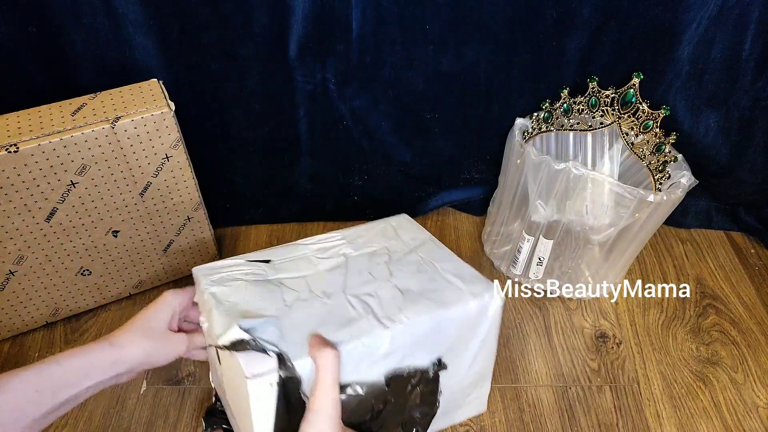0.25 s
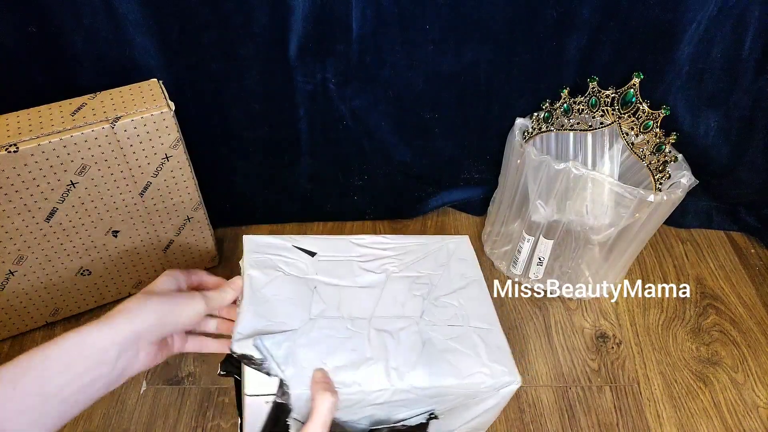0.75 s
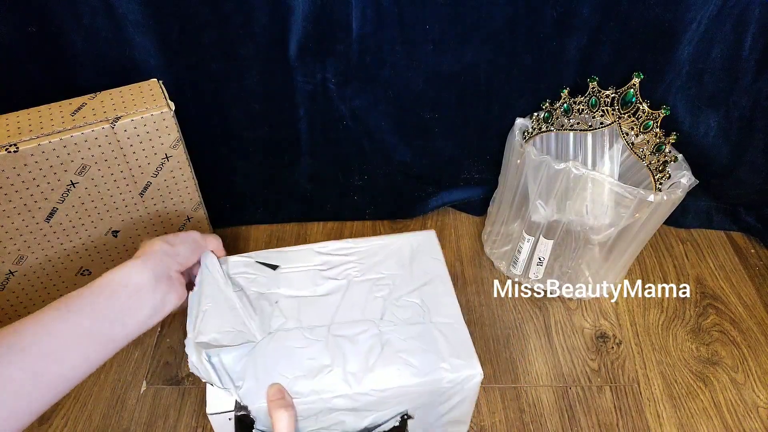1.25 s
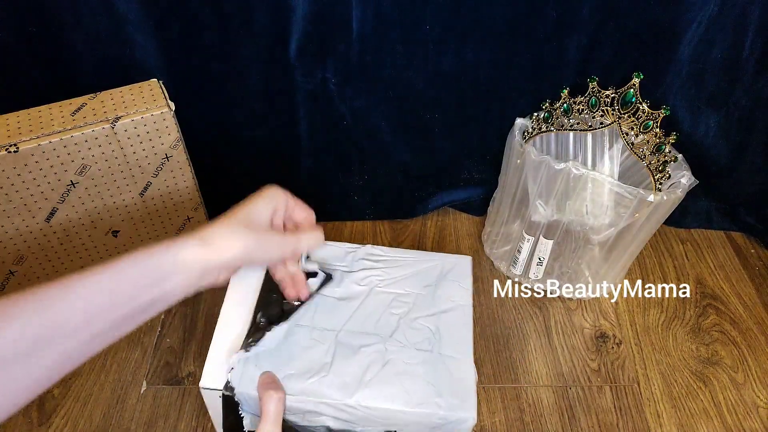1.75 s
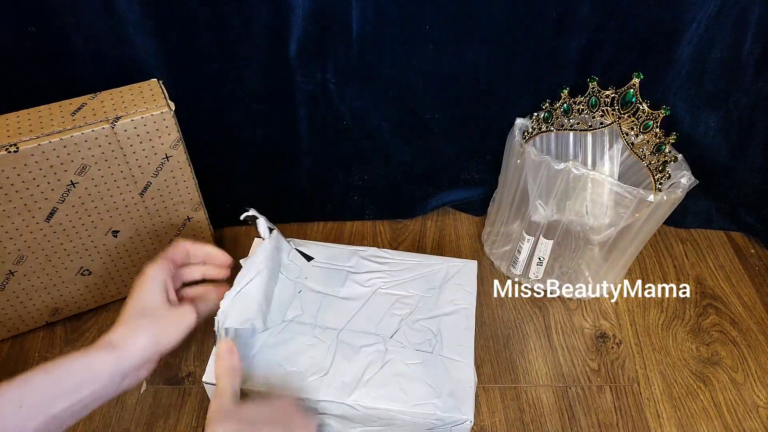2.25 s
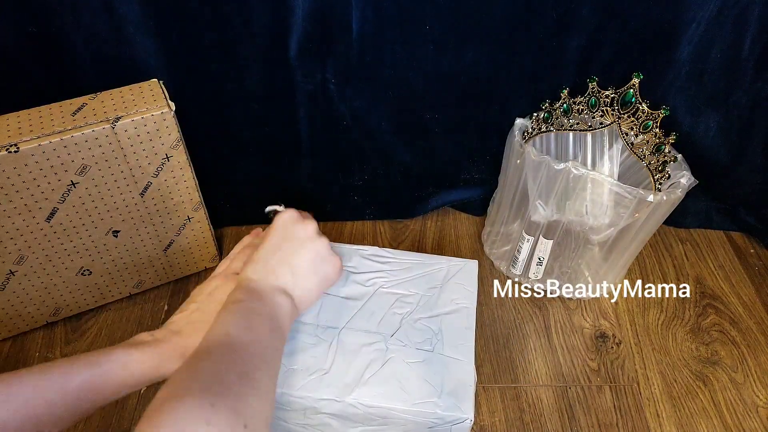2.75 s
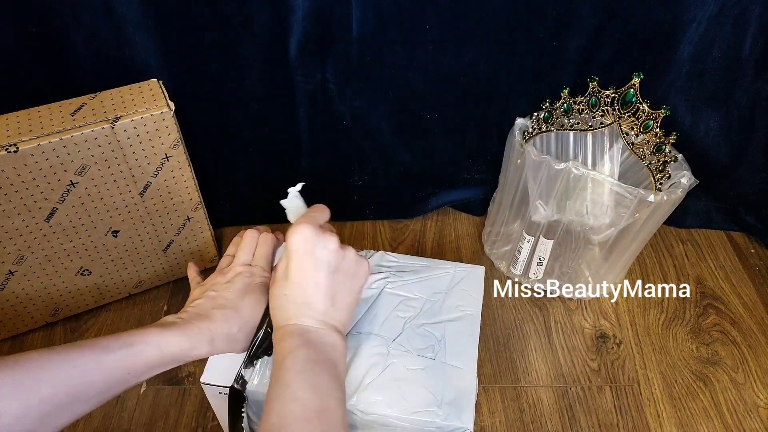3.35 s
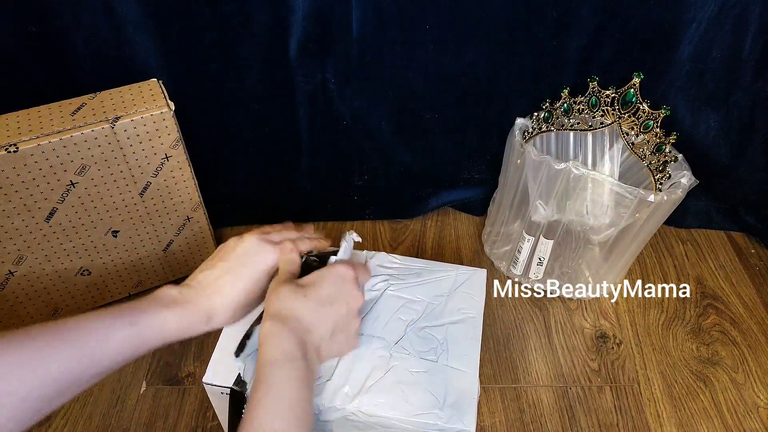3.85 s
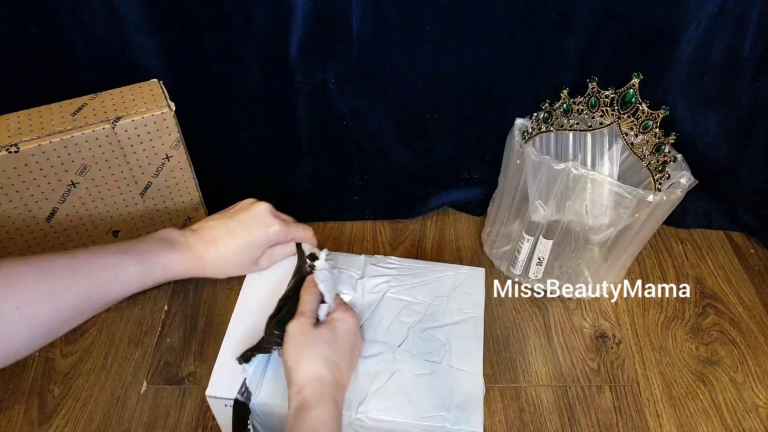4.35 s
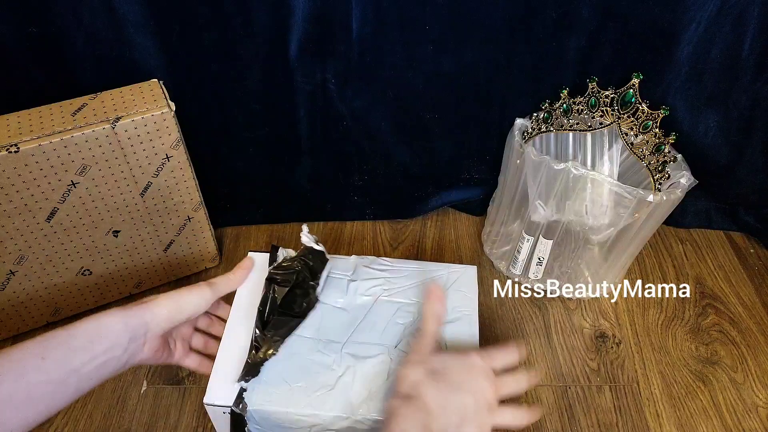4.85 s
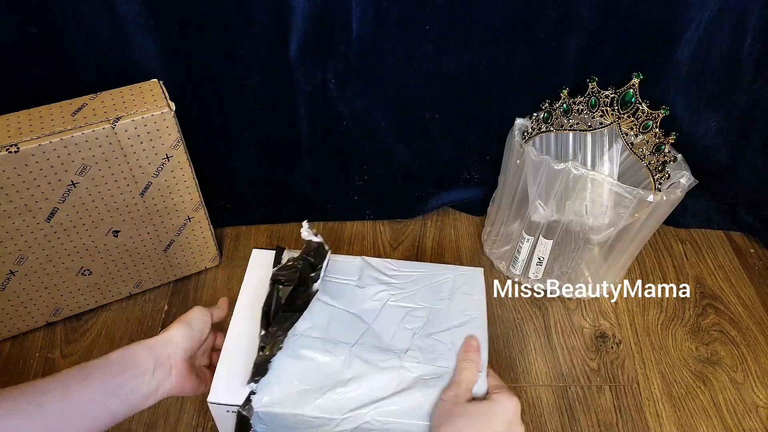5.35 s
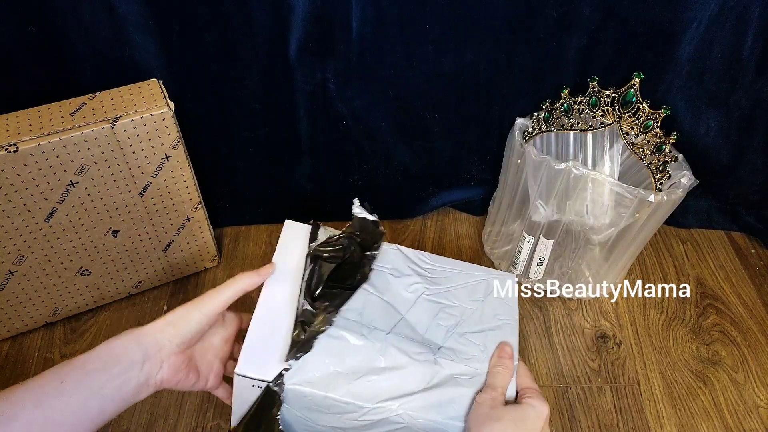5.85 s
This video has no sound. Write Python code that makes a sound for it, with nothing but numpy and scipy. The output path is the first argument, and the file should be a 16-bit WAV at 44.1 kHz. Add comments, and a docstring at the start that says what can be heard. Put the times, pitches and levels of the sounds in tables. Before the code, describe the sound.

Crisp plastic crackles and pops over a faint low room hush, heard closely with a short indoor tail. The wrapping is tugged, released and tugged again; individual creases snap above the fine rustle and a quick tear bursts out. The cardboard box underneath bumps dully against the wooden table and shifts with short muffled slides, ending in a clear bump and fading rustle.

```python
"""In a small room, two hands pull a plastic mailing bag off a cardboard box on a wooden table.
The film rustles with countless clicks of coloured noise; single creases snap and short volleys rip.
Damped sines and noise bursts make the box knock and the table boom, and shaped noise makes it slide.
Fingers squeak on the film as gliding, raspy harmonics; a noise tail gives the room, soft noise its air.
"""
import sys
import numpy as np
from scipy import signal
from scipy.fft import rfft, irfft, next_fast_len
from scipy.io import wavfile
from scipy.ndimage import uniform_filter1d, map_coordinates

SR = 44100
rng = np.random.default_rng(int(sys.argv[2]) if len(sys.argv) > 2 else 0)


def to_wav(s):
    """Save 16-bit WAV."""
    ch = np.atleast_2d(s).T  # columns
    pcm = np.round(np.clip(ch, -1, 1) * 32767)  # PCM
    wavfile.write(sys.argv[1], SR, pcm.astype(np.int16))


N = 269892
TIME = np.arange(N) / SR  # s

# Levels in the tables are dry: trims in the functions and the room come on top.
# A hand takes hold of the film and pulls. Each row: start in seconds, length in seconds,
# crinkle level in dB, fizz above the crinkle in dB, dull rub above the crinkle in dB.
PULLS = [(0.0, 0.024, -49.5, 1, -7.5), (0.249, 0.059, -48, -1.5, -9), (0.401, 0.065, -49.5, 2, -12),
         (0.631, .03, -61.5, -15, 5), (0.757, .19, -48.5, -3.5, -19), (0.985, 0.16, -48, -5.5, -35),
         (1.187, .3, -46, -4, -8), (1.515, .12, -39, -2, -5.5), (1.686, 0.034, -40, -3, -0.5),
         (1.749, .06, -44.5, 1, -9), (1.896, .18, -49, 0.5, -7.5), (2.17, 0.1, -57.5, 0, -27),
         (2.376, .07, -49, 2, -4.5), (2.442, 0.064, -44, 0, -14), (2.588, 0.064, -46, 2, -7),
         (2.704, 0.206, -47.5, 0.5, -8.5), (2.907, 0.16, -40.5, -1.5, -7), (3.158, 0.0346, -42.5, -4, -8),
         (3.255, 0.028, -42, 1.5, -2.5), (3.353, .055, -46, -9.5, -6), (3.599, 0.041, -45, -2.5, -8.5),
         (3.704, 0.32, -50, -4.5, -5.5), (3.94, 0.064, -37.5, -1.5, -6.5), (4.05, .145, -44.5, -1.5, -7.5),
         (4.29, 0.11, -53, -3, -3), (4.431, 0.054, -53, 2.5, -7), (4.516, .05, -49, -2.5, -10.5),
         (4.634, 0.063, -46, -2.5, -9), (4.857, 0.15, -45.5, -5, -7.5), (5.038, 0.051, -42.5, -6, -11.5),
         (5.12, 0.029, -50.5, 5, -13), (5.207, 0.031, -42.5, -2, -4.5), (5.415, 0.11, -51, 2.5, -6.5),
         (5.637, .125, -43.5, 1, -8.5), (5.813, 0.24, -54, -2, -15)]
# Stir of film that is only held: levels of dull rub, crinkle and fizz in dB.
HELD_FILM_DB = (-64.5, -60.5, -61)
# The hands rest. Each row: start in seconds, end in seconds.
PAUSES = [(0.53, 0.65), (2.31, 2.35), (4.76, 4.885), (5.57, 5.645)]
PAUSE_DB = -11.5
# Every movement sets in quickly, builds while it lasts and dies away (release: time to fall to 1/e).
ATTACK_S, BUILD_DB, RELEASE_S = 0.018, 2.5, 0.048
# Colour of the rustling film. Each row: frequency in Hz, relative gain in dB.
FILM_COLOUR = [(240, -36), (400, -4.5), (536, -16), (616, -17), (777, -6), (1130, -10), (1760, -10.5),
               (1900, -9.5), (2360, -6.5), (2970, 0), (3310, -1), (6440, -1.5), (8110, -11), (11900, 1),
               (16000, -8.5)]
# Large creases that snap. Each row: start in seconds, level in dB, treble over bass in dB.
SNAPS = [(0.084, -47, 3), (0.173, -48.5, 12), (0.258, -45.5, 9), (0.421, -49, 23), (0.803, -40.5, 3),
         (0.875, -40.5, 2), (1.0173, -47.5, 7), (1.036, -37.5, 13), (1.081, -40.5, 17), (1.105, -45, 16),
         (1.1982, -40, 27), (1.2362, -40, 8), (1.3314, -39, 6), (1.3728, -38, 5.5), (1.4546, -38.5, 27.5),
         (1.5504, -38, 22), (1.5929, -32.5, 12), (1.6053, -35, 10), (1.658, -39, 18), (1.702, -27, 4.5),
         (1.726, -37, 15), (1.737, -35, 22), (1.8504, -38, -40), (2.028, -46.5, 19), (2.1785, -44, 27),
         (2.285, -46.5, 10), (2.4589, -38.5, 7), (2.6183, -36, 25), (2.6455, -38.5, 12), (2.738, -36.5, 22),
         (2.9665, -35.5, 10), (3.0728, -34.5, 8), (3.169, -43, 12), (3.19, -44, 6), (3.2079, -36, 10),
         (3.2161, -45, 5), (3.236, -41, 7), (3.258, -29.5, 13), (3.3778, -42, 13), (3.4, -40, 13),
         (3.649, -44.5, 4), (4.062, -38.5, 17), (4.101, -38, 5), (4.161, -40, 1), (4.1325, -39, 2),
         (4.186, -40, 5), (4.2404, -34.5, -5), (4.2989, -40, 5), (4.3089, -36, 6.5), (4.3306, -45, 9),
         (4.3619, -32.5, -3), (4.534, -45.5, -1), (4.56, -40.5, -5), (4.887, -44.5, 0), (5.034, -41.5, 18),
         (5.063, -35.5, 18), (5.126, -43, 10), (5.2553, -43.5, -2), (5.3458, -46, 22), (5.42, -43, -3),
         (5.7517, -30, 4.5), (5.987, -47.5, 15)]
# Colour of a snapping crease. Each row: frequency in Hz, relative gain in dB.
SNAP_COLOUR = [(300, -34), (900, -6.5), (1450, -9.5), (2100, 3.5), (3000, 4), (4300, 4.5), (6300, -1),
               (8200, -13), (12000, -2.5), (16000, -17)]
# Runs of tearing or crushing. Each row: start in seconds, time the fade counts from in seconds
# (if before the start, the run sets in at once, already fading), fade to 1/e in seconds, level in dB.
RIPS = [(0.786, 0.806, 0.012, -38.5), (1.585, 1.605, 0.015, -23.5), (2.079, 2.092, 0.0084, -35),
        (3.272, 3.257, 0.013, -42)]
# Fingers slip on the film. Each row: start in seconds, length in seconds,
# pitch at the start, middle and end in Hz, level in dB before the swell.
SQUEAKS = [(0.401, 0.015, 3100, 3200, 2400, -47), (2.209, 0.029, 2710, 2850, 3300, -47.5),
           (5.043, 0.086, 719, 780, 1110, -45), (5.209, 0.073, 1490, 1020, 800, -47.5),
           (5.256, 0.0354, 564, 550, 446, -46.5)]
# The box meets the table or a hand. Each row: time in seconds, thud, clack and table boom levels in dB.
KNOCKS = [(0.002, -48.5, -52, -42.5), (0.464, -37.5, -64, -55.5), (0.669, -34, -47, -55),
          (0.752, -30.5, -44, -44), (0.791, -23, -42, -40.5), (0.801, -25, -28.5, -51),
          (0.846, -34, -61, -51), (0.871, -29, -40, -41), (1.401, -33, -55, -46),
          (1.597, -34.5, -26.5, -66), (1.789, -30, -48, -48), (1.924, -28.5, -43, -44.5),
          (1.937, -43, -38, -43.5), (2.088, -27.5, -37.5, -48.5), (2.358, -38.5, -80, -54),
          (2.457, -30, -27.5, -48.5), (4.01, -38.5, -50, -56), (4.347, -36.5, -36.5, -63),
          (4.889, -20, -55, -65), (4.905, -32.5, -36, -62), (5.423, -36, -55, -66),
          (5.723, -38.5, -48, -48), (5.752, -24.5, -26.5, -42.5)]
# Ring of the box on the table. Each row: frequency in Hz, mean relative level in dB,
# time to fall by 60 dB in seconds.
BOX_MODES = [(197.5, -6.5, 0.12), (250, -7.5, 0.19), (273.2, -2, 0.098), (340, -21, 0.017),
             (374.6, -7, 0.21), (463, -19, 0.16), (557, -37, 0.033), (600, -45, 0.27), (772, -20, 0.17),
             (830, -28, 0.2)]
TABLE_HZ, TABLE_T60_S = 119.5, 0.45
# The box is dragged over the table. Each row: start in seconds, length in seconds, level in dB.
DRAGS = [(0.0, .3, -58), (0.7, 0.12, -51), (1.015, 0.07, -61.5), (1.574, 0.21, -51.5), (2.086, 0.14, -72),
         (4.916, 0.12, -55.5), (5.76, 0.13, -60.5)]
# Colour of cardboard sliding on wood. Each row: frequency in Hz, relative gain in dB.
SLIDING_COLOUR = [(29, -50), (50, -19), (118, 2), (150, 3), (265, 5), (400, 0), (535, -4), (657, -2.5),
                  (733, -25), (900, -20), (1170, -48), (1980, -120)]
# Where the hands work. Each row: time in seconds, delay of the right channel behind the left in seconds.
PLACE = [(0, .0001), (2.0, .00009), (3.3, .00005), (4.8, .00009), (5.1, -.00002), (6.12, -.00004)]
# Decay of the room. Each row: frequency in Hz, time to fall by 60 dB in seconds.
ROOM_T60 = [(120, 0.35), (300, 0.33), (900, 0.35), (4000, 0.32), (13000, 0.19)]
# Colour of the quiet air. Each row: frequency in Hz, relative gain in dB.
AIR_COLOUR = [(25, -72), (42, 5), (55, -12.5), (88, 7), (150, -9), (270, -4.5), (600, -38), (2000, -18),
              (7000, -21.5), (16000, -24)]
AIR_DB = -60
CUTOFF_HZ = 16100


def rustle(strengths, rub_db=-2.0, crinkle_db=-1.07, fizz_db=1.17, per_s=1100, crowding=0.7):
    """The film crumples under the hands: the harder they pull, the more creases buckle."""
    pull = (strengths[1] / np.median(strengths[1])) ** crowding
    buckles = crackle(per_s * pull, spread_db=4.0, clump_db=5.5)
    out = 0
    for part, strength, trim_db in zip(split(buckles, 2090, 7050), strengths, (rub_db, crinkle_db, fizz_db)):
        out = out + rms_one(part) * strength * from_db(trim_db)
    return out


def handling():
    """Strength of rub, crinkle and fizz: pulls add in power to the held film; all drop in the pauses."""
    resting = sum(1.0 * ((TIME > start) & (TIME < end)) for start, end in PAUSES)
    resting = uniform_filter1d(resting, SR // 50)  # ease in and out
    power = from_db(HELD_FILM_DB)[:, None] ** 2
    for start, length, db, fizz, rub in PULLS:
        peak = from_db([db + rub, db, db + fizz])[:, None]
        power = power + peak ** 2 * movement(start, length) ** 2
    return np.sqrt(power) * from_db(PAUSE_DB * resting)


def movement(start, length):
    """Force of one movement of a hand: attack, build-up, release."""
    t = TIME - start
    attack = np.clip(t / ATTACK_S, 0, 1)
    build = from_db(BUILD_DB * (np.clip(t / length, 0, 1) - 1))
    release = np.exp(-np.maximum(t - length, 0) / RELEASE_S)
    return attack * build * release


def crackle(per_s, spread_db, clump_db, tone=0.84, count=30):
    """Buckles at random, in clumps, from creases that each favour a pitch; steady in level."""
    born = rng.random(N) < per_s * from_db(clump_db * drift(70)) / SR
    loudness = from_db(spread_db * np.minimum(rng.exponential(1, N), 3.3))
    clicks = born * loudness * rng.choice([-1, 1], N)
    dealt = rng.integers(0, count, N)  # which crease each click belongs to
    out = 0
    for k, hz in enumerate(np.geomspace(1300, 15000, count)):
        burst = rms_one(crease(fade_s=0.00045, rise_s=0.0002, scatter_s=0.003, scatter_db=-17))
        pitched = signal.lfilter(*signal.iirpeak(hz, 3, fs=SR), burst)
        burst = burst + tone * rms_one(pitched)
        own_clicks = (clicks * (dealt == k))[None]
        out = out + signal.oaconvolve(own_clicks, burst, axes=1)[:, :N]
    out = colour(out, FILM_COLOUR)
    running_power = uniform_filter1d(np.mean(out ** 2, 0), SR // 20)
    return out / np.sqrt(running_power + 1e-9)


def crease(fade_s, rise_s, scatter_s, scatter_db, unlike=0.73, wander_s=0.00003):
    """One buckle: a brief crack, then scatter from box and table, from a spot of its own."""
    t = np.arange(SR // 60) / SR - 0.001  # silent for the first millisecond
    shared, left, right = rng.standard_normal((3, len(t)))
    crack = np.exp(-abs(t) / fade_s)
    scatter = from_db(scatter_db) * np.exp(-abs(t) / scatter_s)
    shape = np.clip(t / rise_s, 0, 1) * (crack + scatter)
    shift = round(wander_s * SR * rng.standard_normal())  # samples between the channels
    left_burst = (shared + unlike * left) * shape
    right_burst = (shared + unlike * right) * shape
    return np.array([left_burst, np.roll(right_burst, shift)])


def snaps(crack_db=-5.0):
    """Large creases give way one by one: slack film pops low, taut film cracks high."""
    out = np.zeros((2, N))
    for s, db, treble in SNAPS:
        burst = crease(fade_s=0.0009, rise_s=0.0006, scatter_s=0.003, scatter_db=-18)
        parts = split(colour(burst, SNAP_COLOUR), 3190, 6630)
        tilts_db = (-treble / 2, crack_db, treble / 2)
        snap = sum(rms_one(part) * from_db(tilt) for part, tilt in zip(parts, tilts_db))
        add(out, s, from_db(db) * rms_one(snap))
    return out


def rips():
    """A tear runs as a dense volley of buckles that swells or sets in at once, then dies."""
    force = 0
    for start, fade_from, fade, db in RIPS:
        rise = np.clip((TIME - start) / max(fade_from - start, 1e-3), 0, 1)
        dying = np.exp(-np.maximum(TIME - fade_from, 0) / fade)
        force = force + from_db(db) * rise * dying
    return force * crackle(per_s=4000, spread_db=2.5, clump_db=2)


def squeaks(overtone_db=-3.5, stutter_db=3.5, wobble=0.027, top_hz=4200, count=5):
    """Skin sticks and slips on the film: a raspy gliding tone whose slips vary in spacing and force."""
    out = np.zeros(N)
    spacing = 1 + wobble * drift(700)
    force = from_db(stutter_db * drift(400))
    for s, length, first, middle, last, db in SQUEAKS:
        u = np.linspace(0, 1, int(length * SR))
        span = int(s * SR) + np.arange(len(u))
        pitch = np.interp(u, [0, 0.5, 1], [first, middle, last]) * spacing[span]
        phase = 2 * np.pi * np.cumsum(pitch) / SR
        harmonics = sum(from_db(overtone_db * k) * np.sin((k + 1) * phase) for k in range(count))
        tone = cut(harmonics, top_hz, "low", order=4)
        add(out, s, from_db(db) * rms_one(tone * force[span]) * np.sin(np.pi * u))
    return out


def knocks(thud_db=-17.5, clack_db=-22.5, boom_db=-11.5, rattle_db=-3.5,
           rattle_s=0.013, clack_s=0.0041, press_s=0.0011, delay_s=0.00096):
    """Each blow rings the box with fresh strengths, rattles its walls, clacks and booms in the table top."""
    out, t = np.zeros((2, N)), np.arange(SR // 3) / SR
    hz, level, t60 = np.transpose(BOX_MODES)[:, :, None]
    press = np.sin(np.pi / 2 * np.clip(t / press_s, 0, 1)) ** 2  # cardboard yields before it pushes back
    for s, thud, clack, boom in KNOCKS:
        strength = level + 2.5 * rng.standard_normal(hz.shape)  # dB
        modes = from_db(strength - 60 * t / t60) * np.sin(2 * np.pi * (hz * t + rng.random(hz.shape)))
        ring = np.sum(modes, 0)
        rattle = diffuse(len(t), apart_hz=1500) * np.exp(-t / rattle_s)
        rattle = cut(rattle, [160, 600], "band", order=3)
        contact = diffuse(len(t), apart_hz=3000) * np.exp(-t / clack_s)
        contact = cut(contact, [620, 1600], "band", order=3)
        table = from_db(-60 * t / TABLE_T60_S) * np.sin(2 * np.pi * TABLE_HZ * t)
        box = rms_one(rms_one(ring) + from_db(rattle_db) * rms_one(rattle))
        body = from_db(thud + thud_db) * box + from_db(boom + boom_db) * rms_one(table)
        add(out, s + delay_s, press * body + from_db(clack + clack_db) * rms_one(contact))
    return cut(out, 80, "high", order=3)


def slide(rub, level_db=-2.5, judder_db=5.5, carried_db=-9.0):
    """The box drags unevenly over the table, and its walls carry the rub of the hands."""
    force = from_db(carried_db) * rub
    for start, length, db in DRAGS:
        force = force + from_db(db + level_db) * movement(start, length)
    scrape = rms_one(colour(diffuse(N, apart_hz=1400), SLIDING_COLOUR))
    return force * from_db(judder_db * drift(40)) * scrape


def placed(x):
    """The right channel hears the hands a little later or earlier than the left."""
    late = np.arange(N) - in_time(PLACE)[0] * SR
    return np.array([x[0], map_coordinates(x[1], [late], order=3, mode="nearest")])


def room(x, wet_db, gap_s=0.002):
    """Direct sound plus a short noise tail that dies band by band."""
    t, tail = np.arange(SR // 2) / SR, 0
    edges = np.geomspace(70, 18000, 9)  # Hz
    for low, high in zip(edges, edges[1:]):
        decay = from_db(-60 * t / at_hz(ROOM_T60, np.sqrt(low * high)))
        tail = tail + cut(diffuse(len(t)), [low, high], "band") * decay
    onset = np.clip(t / gap_s - 1, 0, 1)  # silent for one gap, full after two
    tail = rms_one(tail * onset) / np.sqrt(len(t))
    return x + from_db(wet_db) * signal.oaconvolve(x, tail, axes=1)[:, :N]


def air():
    """The quiet air of the room: steady coloured noise from all sides."""
    return from_db(AIR_DB) * rms_one(colour(diffuse(N, apart_hz=403), AIR_COLOUR))


def diffuse(size, apart_hz=900):
    """Noise from all sides: the two channels agree only on long waves."""
    mid, side = rng.standard_normal((2, size))
    return mid + cut(side, apart_hz, "high", order=1) * [[1], [-1]]


def drift(rate):
    """Smooth chance with spread 1, heading for a new value `rate` times a second."""
    knots = rng.standard_normal(5000)
    return rms_one(np.interp(TIME * rate, np.arange(len(knots)), knots))


def colour(x, spectrum):
    """Give a sound a spectral shape."""
    size = next_fast_len(x.shape[-1])
    gain = from_db(at_hz(spectrum, np.arange(size // 2 + 1) * SR / size))
    return irfft(rfft(x, size) * gain, size)[..., :x.shape[-1]]


def split(x, low_hz, high_hz):
    """Low, middle and high parts that sum to the whole."""
    low, below = [signal.sosfiltfilt(signal.butter(4, hz, fs=SR, output="sos"), x) for hz in (low_hz, high_hz)]
    return low, below - low, x - below


def cut(x, hz, kind, order=2):
    """Butterworth filter."""
    return signal.sosfilt(signal.butter(order, hz, kind, fs=SR, output="sos"), x)


def add(out, s, sound):
    """Mix a sound in at a time in seconds."""
    i = int(np.clip(round(s * SR), 0, N - 1))
    out[..., i:i + sound.shape[-1]] += sound[..., :N - i]


def in_time(rows):
    """Each column of a curve at every sample."""
    s, *columns = np.transpose(rows)
    return [np.interp(TIME, s, c) for c in columns]


def at_hz(points, hz):
    """Read a table on a log-frequency axis."""
    table_hz, values = np.transpose(points)
    return np.interp(np.log(hz + 1e-9), np.log(table_hz), values)


def from_db(db):
    """Decibels to gain."""
    return 10 ** (np.asarray(db) / 20)


def rms_one(x):
    """Scale to unit rms."""
    return x / np.sqrt(np.mean(x ** 2) + 1e-20)


def scene():
    """Film and box in the room, over its quiet air."""
    strengths = handling()
    film = room(placed(rustle(strengths) + snaps() + rips() + squeaks()), wet_db=-8.5)
    # the film's lows lean left and its highs lean right
    low, middle, high = split(film, 4400, 11300)
    film = low * from_db([[1.0], [-1.0]]) + middle + high * from_db([[-0.6], [0.6]])
    box = room(placed(knocks() + slide(rub=strengths[0])), wet_db=-7.0)
    box = box * from_db([[0.7], [-0.7]])  # the box leans left
    return film + box + air()


def record(dry):
    """The top is cut steeply by an elliptic low-pass."""
    return signal.sosfilt(signal.ellip(10, 0.2, 75, CUTOFF_HZ, fs=SR, output="sos"), dry)


dry = scene()
out = record(dry)
to_wav(out)
```